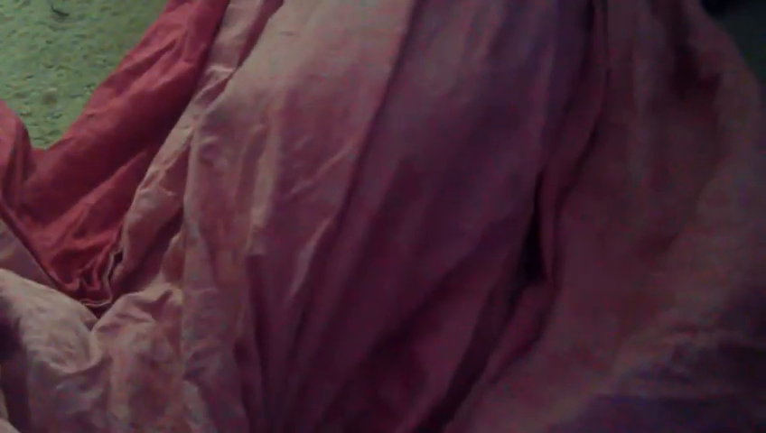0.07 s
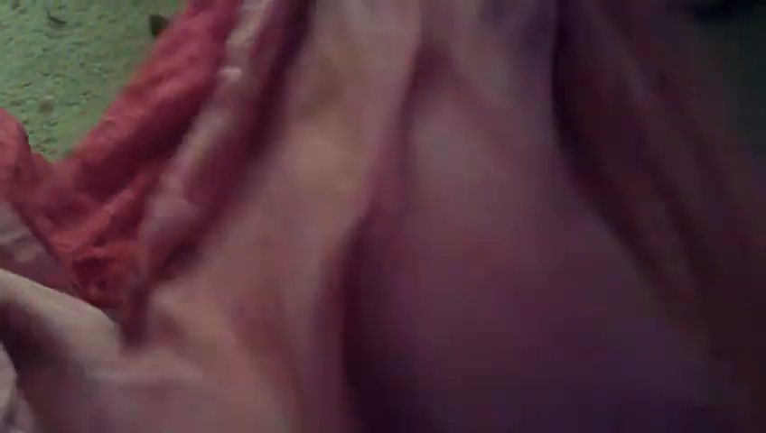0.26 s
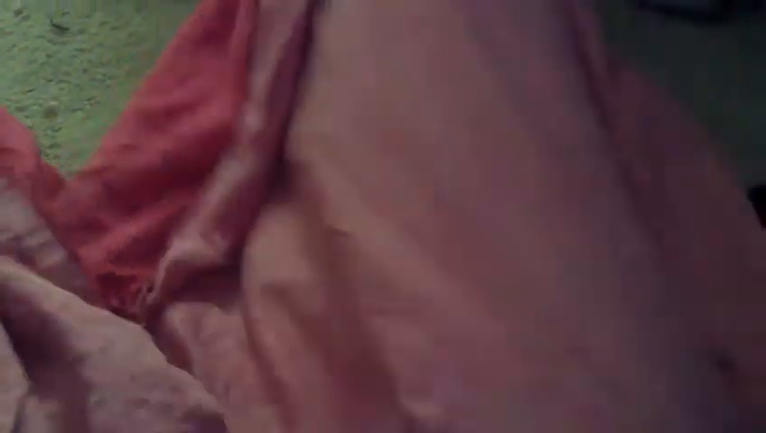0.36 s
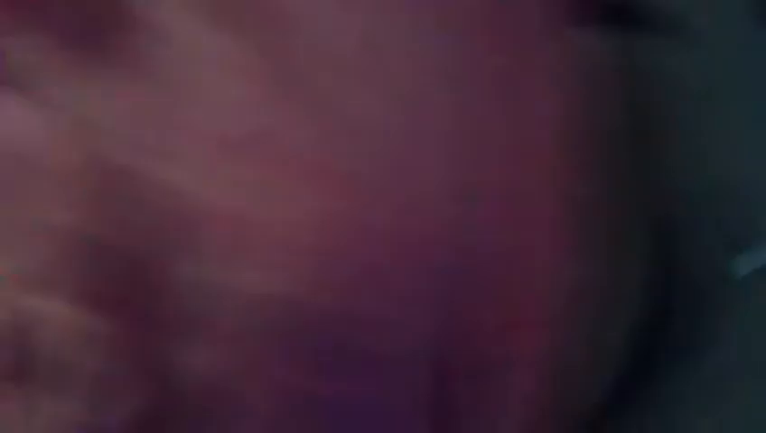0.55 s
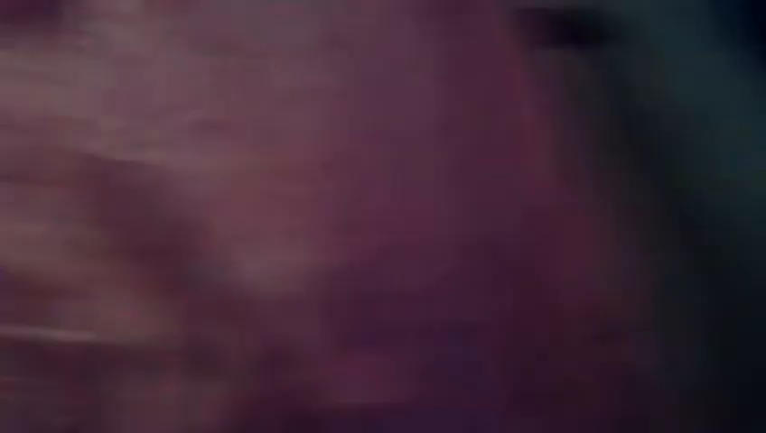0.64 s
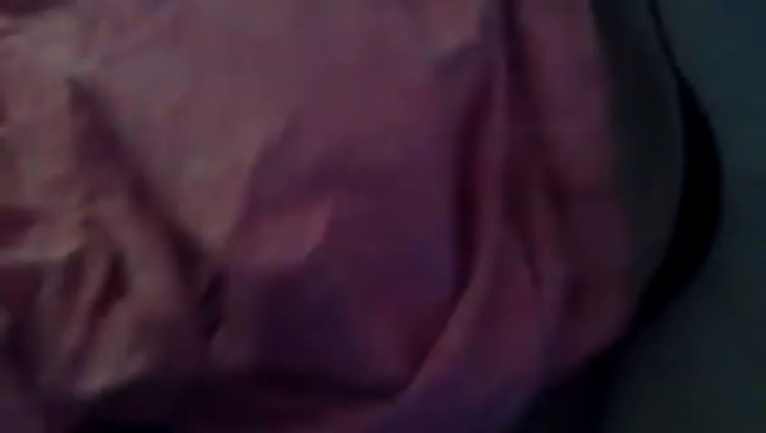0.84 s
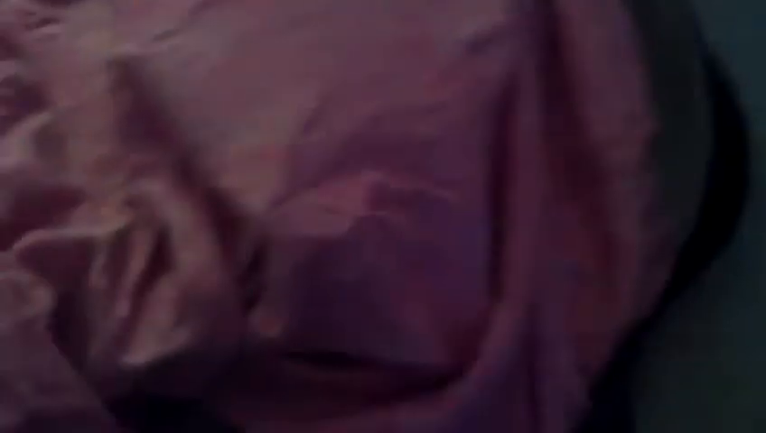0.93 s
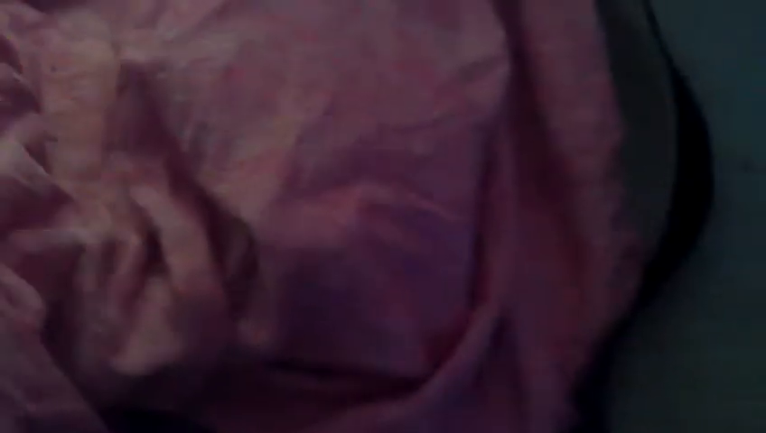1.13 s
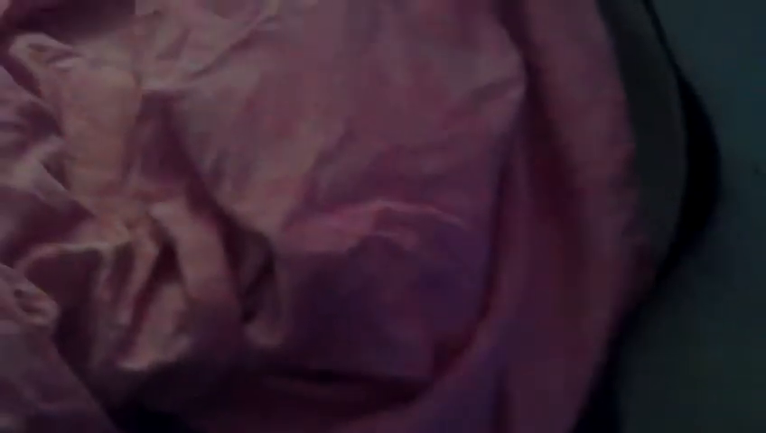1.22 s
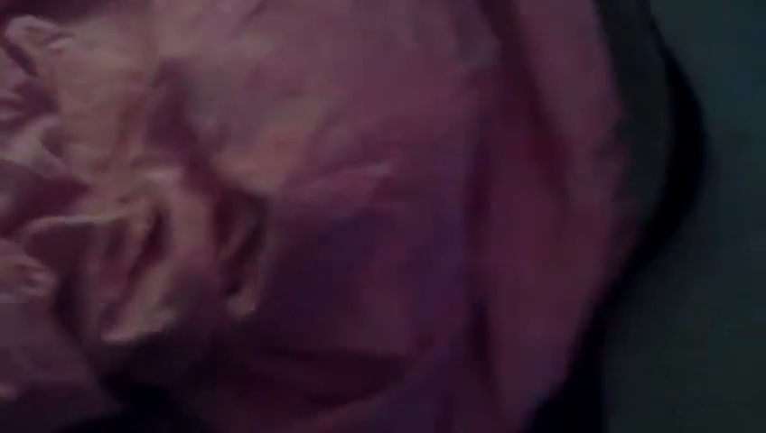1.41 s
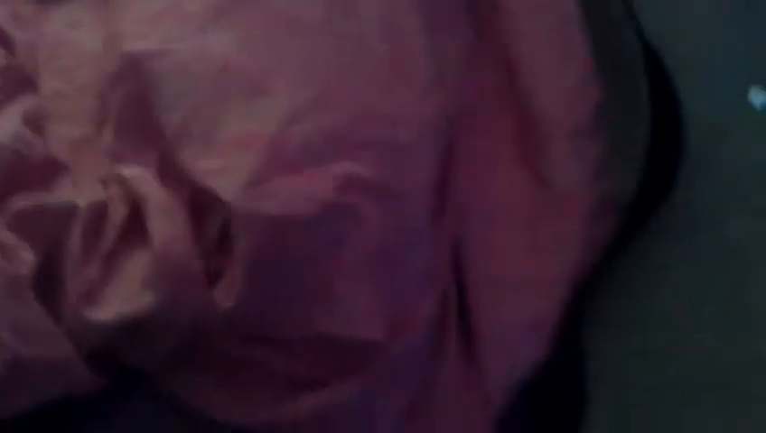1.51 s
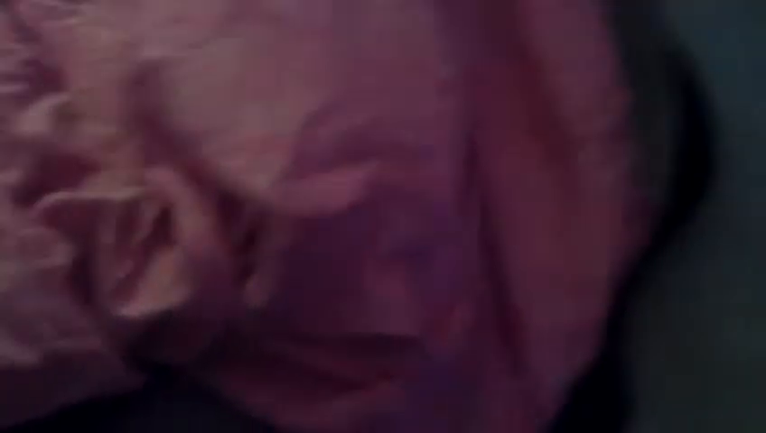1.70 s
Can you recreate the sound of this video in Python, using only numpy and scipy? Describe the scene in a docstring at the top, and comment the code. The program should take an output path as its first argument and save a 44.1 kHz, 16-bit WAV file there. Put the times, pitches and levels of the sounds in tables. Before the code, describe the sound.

Crumpled cloth rustles close by, with crisp snaps and a few small metal clinks.

```python
"""In a small quiet room, crumpled cloth is pulled about close to the microphone.
Friction makes it rustle as it slides, and its folds buckle with dry snaps and soft flaps.
Something small and hard on it, probably a zip pull, is struck and rings briefly in its normal modes.
Snaps and clinks leave a short reverberation, and a faint steady whirr lies behind."""
import sys
import numpy as np
from scipy import signal
from scipy.fft import rfft, irfft
from scipy.io import wavfile

SR = 44100
rng = np.random.default_rng(int(sys.argv[2]) if len(sys.argv) > 2 else 0)


def materialize(psi):
    """Save the field psi as 16-bit PCM at rate SR to the path in sys.argv[1].

    A 1-D psi becomes a single channel; in a 2-D psi each row is a channel.
    """
    bounded = np.clip(np.atleast_2d(psi).T, -1, 1)
    quanta = np.round(bounded * 32767).astype(np.int16)
    wavfile.write(sys.argv[1], SR, quanta)


N = 77175
T = np.arange(N) / SR
HZ = np.maximum(np.arange(N // 2 + 1) * SR / N, 1)


def from_db(db):
    """Amplitude grows tenfold for every 20 dB."""
    return 10 ** (np.asarray(db) / 20)


def unit_rms(x):
    """Normalisation: the mean power becomes 1."""
    return x / np.sqrt(np.mean(x ** 2) + 1e-20)


def spectral_gain(points):
    """Spectral envelope: levels are interpolated over log frequency and returned as gains."""
    hz, db = np.transpose(points)
    return from_db(np.interp(np.log(HZ), np.log(hz), db))


def pan(left_minus_right_db):
    """A level difference between the ears places a source to one side."""
    return from_db(np.array([[.5], [-.5]]) * left_minus_right_db)


# Stereo width: frequency_hz, side_minus_mid_db
STEREO_WIDTH = [(40, 7), (150, -17), (350, -16), (700, -8), (1400, -4), (3000, -2), (6000, -2),
                (12000, -2.5)]

def colour(white_pair, gain):
    """Mid-side stereo: two uncorrelated signals are filtered, then added and subtracted; rms 1."""
    mid, side = rfft(white_pair) * gain
    width = spectral_gain(STEREO_WIDTH)
    left_right = np.array([mid + width * side, mid - width * side]) / np.sqrt(1 + width ** 2)
    return unit_rms(irfft(left_right, N))


def noise(gain):
    """Filtered Gaussian noise takes on the spectrum of its filter."""
    return colour(rng.standard_normal((2, N)), gain)


def decay(start_s, attack_s, t60_s):
    """Damping: after a linear rise, amplitude falls exponentially, by 60 dB in t60_s."""
    age_s = np.maximum(T - start_s, 0)
    return np.minimum(age_s / attack_s, 1) * from_db(-np.minimum(60 * age_s / t60_s, 200))


def burst(gain, envelope):
    """Amplitude modulation: a noise burst carries the energy of its envelope."""
    return unit_rms(noise(gain) * envelope) * np.sqrt(np.mean(envelope ** 2))


# Spectrum of the background noise: frequency_hz, density_db
WHIRR_SPECTRUM = [(18, -39), (30, -8), (49, -38), (70, -18), (247, -1.5), (690, -8), (826, -6), (939, -1.5),
                  (3960, -12.5), (7340, -25), (9010, -29), (11700, -25), (14000, -46)]

def whirr():
    """Stationary noise lies under one tone, whose pitch wanders by random frequency modulation."""
    noise_db, tone_db = -66, -68.5
    pitch_hz, wander_rms_hz, wander_corner_hz = 826, 4.47, 16
    slow_spectrum = rfft(rng.standard_normal(N)) / (1 + (HZ / wander_corner_hz) ** 2)
    wander_hz = wander_rms_hz * unit_rms(irfft(slow_spectrum, N))
    tone = np.sqrt(2) * np.sin(2 * np.pi * np.cumsum(pitch_hz + wander_hz) / SR)
    return from_db(noise_db) * noise(spectral_gain(WHIRR_SPECTRUM)) + from_db(tone_db) * tone


# Loudness of the rustle in three bands: time_s, level_db
BASS_LEVELS = [(0, -66), (.17, -66), (.21, -45), (.25, -52.5), (.31, -48.5), (.38, -52.5), (.45, -59.5),
               (.56, -69.5), (.69, -55), (.80, -60), (.87, -54), (1.0, -62), (1.17, -67.5), (1.24, -60),
               (1.42, -62.5), (1.6, -60.5), (1.75, -62)]
MIDDLE_LEVELS = [(0, -69.5), (.17, -68.5), (.215, -48), (.255, -51), (.31, -45), (.37, -55), (.45, -60.5),
                 (.56, -68), (.68, -55), (.80, -59.5), (.87, -54), (1.0, -61.5), (1.17, -69.5),
                 (1.24, -55.5), (1.42, -59.5), (1.6, -60.5), (1.75, -62.5)]
TREBLE_LEVELS = [(0, -82.5), (.17, -74.5), (.21, -51), (.258, -53), (.31, -35.5), (.345, -54), (.44, -69.5),
                 (.57, -73), (.68, -55.5), (.80, -67.5), (.87, -53), (.915, -63.5), (.955, -55.5),
                 (1.0, -69), (1.15, -74), (1.26, -54), (1.36, -64.5), (1.68, -72), (1.75, -64.5)]
# Spectrum of each band: frequency_hz, density_db
BASS_SPECTRUM = [(30, -32), (90, -20), (160, -7), (260, 3), (420, -0.5), (580, -1.5), (780, 2),
                 (1100, -11.5), (2000, -37)]
MIDDLE_SPECTRUM = [(400, -18), (850, 0), (1200, 0.5), (1600, 2), (2400, 1), (3200, -7.5), (4200, -9.5),
                   (7000, -63)]
TREBLE_SPECTRUM = [(2000, -42), (3000, -0.5), (4000, 4.5), (5500, 0), (6300, -1.5), (7400, -5.5), (9000, 2),
                   (10200, -1.5), (11800, -11), (13000, -44), (14500, -67)]

def sliding_cloth():
    """Friction: cloth rubbing on cloth gives a dense patter of catching fibres in a smooth hiss."""
    catches_per_s, spread_db, catch_power_share = 3200, 2.5, .4
    out = np.zeros((2, N))
    for levels, spectrum in ((BASS_LEVELS, BASS_SPECTRUM), (MIDDLE_LEVELS, MIDDLE_SPECTRUM),
                             (TREBLE_LEVELS, TREBLE_SPECTRUM)):
        sizes = from_db(spread_db * np.minimum(rng.exponential(1, N), 5))
        caught = rng.random(N) < catches_per_s / SR
        patter = unit_rms(caught * sizes * rng.choice([-1, 1], (2, N)))
        hiss = rng.standard_normal((2, N))
        rub = np.sqrt(catch_power_share) * patter + np.sqrt(1 - catch_power_share) * hiss
        envelope = from_db(np.interp(T, *np.transpose(levels)))
        out += envelope * colour(rub, spectral_gain(spectrum))
    return out * pan(left_minus_right_db=1.6)


# Folds, from dull flaps to crisp snaps: start_s, level_db, pitch_hz, width_octaves, t60_s, pan_db
FOLD_BUCKLES = [(0.2104, -38.5, 354, 0.39, 0.052, 0), (0.2124, -34, 700, 0.32, 0.041, -2),
                (0.3012, -23, 3050, 0.35, 0.012, 1), (0.3037, -34.5, 380, 0.2, 0.044, 4),
                (0.3432, -34.5, 885, 0.32, 0.011, 6), (0.3532, -43, 890, 1.2, 0.031, 4),
                (0.378, -40, 760, 0.83, 0.017, 0), (.654, -41, 1970, 0.72, 0.019, 4),
                (0.683, -45, 1200, 1.1, 0.027, -4), (0.8254, -38, 2200, 0.61, 0.022, 0),
                (0.8344, -30.5, 2520, 0.9, 0.011, 7), (.835, -49, 285, 0.47, 0.078, -1),
                (.836, -35.5, 765, 0.13, 0.05, 2), (0.8376, -28, 1900, 0.46, 0.019, -1),
                (0.855, -46.5, 8900, 0.13, 0.029, -5), (0.8554, -36, 1500, 0.89, 0.021, 6),
                (0.8601, -26, 1630, 0.34, 0.019, 0), (0.8655, -40.5, 1670, 0.65, 0.073, 0),
                (0.8727, -42.5, 4500, 0.85, 0.0082, -4), (0.875, -50, 3980, 0.055, 0.15, -1),
                (.8945, -52, 9500, 0.28, 0.022, -5), (0.9255, -39.5, 8650, 0.5, 0.013, -2),
                (0.9438, -39, 8300, 0.77, 0.023, 4), (0.942, -46.5, 980, 1.5, 0.11, 3.5),
                (1.073, -60, 10000, 0.24, 0.023, -5), (1.197, -51, 2320, 0.93, 0.046, 1),
                (1.2236, -49, 5400, 0.72, .012, -1), (1.473, -49.5, 3260, 0.62, 0.031, 4),
                (1.53, -49, 600, 0.41, 0.051, 3), (1.589, -47.5, 1090, 1.06, 0.025, 1),
                (1.617, -48, 1660, 0.95, .03, 2)]

def buckling_folds():
    """Buckling: a fold gives a heavily damped burst around one pitch, low if slack, high if taut."""
    attack_s, skirt_db = 0.00041, -29
    pass_band_hz = [180, 11200]  # the folds are heard little outside this band
    out = np.zeros((2, N))
    for start_s, level_db, pitch_hz, width_octaves, t60_s, pan_db in FOLD_BUCKLES:
        octaves_away = np.log2(HZ / pitch_hz)
        hump = np.exp(-.5 * (octaves_away / width_octaves) ** 2)
        skirt = from_db(skirt_db) / (1 + octaves_away ** 2)
        out += from_db(level_db) * pan(pan_db) * burst(hump + skirt, decay(start_s, attack_s, t60_s))
    return signal.sosfilt(signal.butter(4, pass_band_hz, "band", fs=SR, output="sos"), out)


# Impacts on the metal: start_s, low_db, middle_db, high_db, tick_db, ring_time_ratio, favoured_hz
METAL_IMPACTS = [(0.289, -41.5, -25.5, -28, -25, 0.96, 9890), (0.3042, -38, -39, -25.5, -33, 0.89, 10930),
                 (0.6716, -41.5, -49, -56.5, -58, 0.87, 7390), (0.6883, -43.5, -42.5, -49, -48, 0.87, 7390),
                 (1.2351, -38, -34, -38, -45, 0.87, 10930), (1.2359, -35.5, -38, -33.5, -44, 0.38, 6400),
                 (1.2755, -70, -54, -49, -59, 0.88, 10010), (1.2905, -45.5, -47, -42, -59, 1.5, 9000),
                 (1.2995, -49.5, -56, -50, -56, 1.43, 4460)]
# Its normal modes: pitch_hz, mode_db, t60_s, pan_db
METAL_MODES = [(3900, -5, .04, 5), (4100, -1, .04, 3), (4460, -2, .06, 1), (5100, -11, .025, 4),
               (6400, 1, .056, 3), (7390, -3, .045, 3), (8860, -4, .05, -3), (9090, -4, .027, 0),
               (9560, -8, .025, -2), (9790, -3, .033, 2), (10010, -3, .045, -1), (10720, -8, .02, -2),
               (10930, -3, .033, -1), (11570, -8, .025, 2), (12100, -14, .025, 0), (13050, -15, .035, 0)]
# Spectrum of the contact tick: frequency_hz, density_db
TICK_SPECTRUM = [(200, -30), (1000, -1), (3000, -9), (4100, 10), (5700, -7), (7300, 0), (8200, 7),
                 (10500, 2), (12000, 8), (14000, -29)]

def metal_clinks():
    """Modal vibration: each impact ticks and excites the metal's modes, which the cloth damps."""
    attack_s, tick_t60_s, spread_db, ear_phase_rad = 0.00066, .024, 3, 1.25
    group_centres_hz = [4460, 6730, 9100]  # low, middle and high modes
    favour_db, favour_width_hz = 7.5, 150  # the spot struck brings out modes near favoured_hz
    out = np.zeros((2, N))
    for start_s, *group_levels_db, tick_db, ring_time_ratio, favoured_hz in METAL_IMPACTS:
        out += from_db(tick_db) * burst(spectral_gain(TICK_SPECTRUM), decay(start_s, attack_s, tick_t60_s))
        for k, (pitch_hz, mode_db, t60_s, pan_db) in enumerate(METAL_MODES):
            level_db = mode_db + np.interp(pitch_hz, group_centres_hz, group_levels_db)
            level_db += spread_db * rng.standard_normal()
            level_db += favour_db * np.exp(-((pitch_hz - favoured_hz) / favour_width_hz) ** 2)
            phase = rng.uniform(0, 2 * np.pi) + np.array([[0], [ear_phase_rad]]) * (-1) ** k
            envelope = decay(start_s, attack_s, t60_s * ring_time_ratio)
            out += from_db(level_db) * pan(pan_db) * envelope * np.sin(2 * np.pi * pitch_hz * T + phase)
    return out


def room_reverberation(x):
    """Diffuse reflection: convolution with decaying noise gives a short tail, different at each ear."""
    onset_s, level_db = 0.0046, -18
    tail = rng.standard_normal((2, N)) * decay(onset_s, attack_s=onset_s, t60_s=0.2)
    tail /= np.sqrt(np.sum(tail ** 2, axis=1, keepdims=True))
    return from_db(level_db) * signal.fftconvolve(x, tail, axes=1)[:, :N]


def scene():
    """Superposition: whirr, rustle, transients and the transients' reverberation add."""
    transients = buckling_folds() + metal_clinks()
    return whirr() + sliding_cloth() + transients + room_reverberation(transients)


def record(dry):
    """Band limiting: an elliptic low-pass filter cuts the highest treble steeply."""
    cutoff_hz = 13750
    return signal.sosfilt(signal.ellip(10, .1, 75, cutoff_hz, fs=SR, output="sos"), dry)


dry = scene()
out = record(dry)
materialize(out)
```